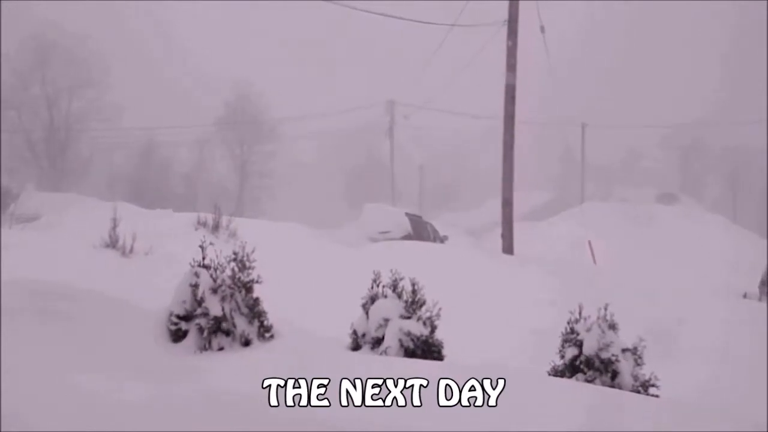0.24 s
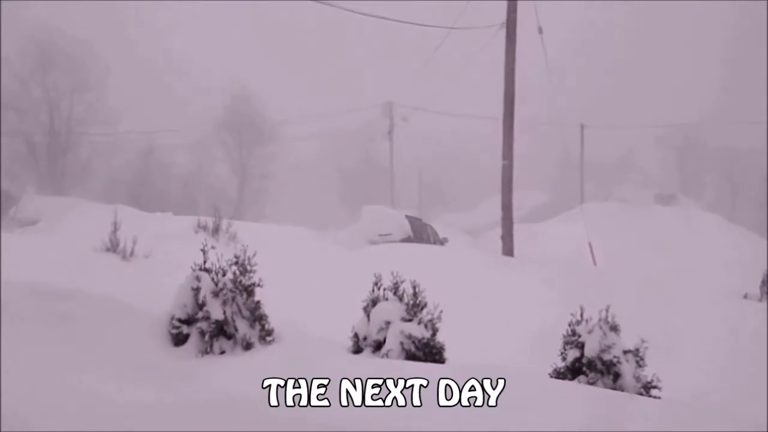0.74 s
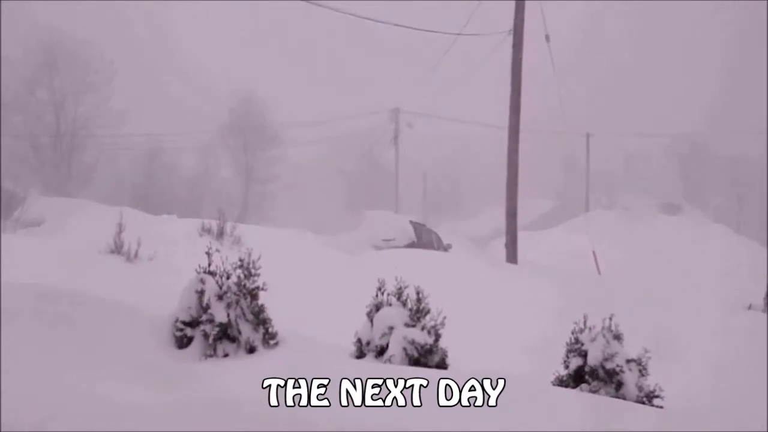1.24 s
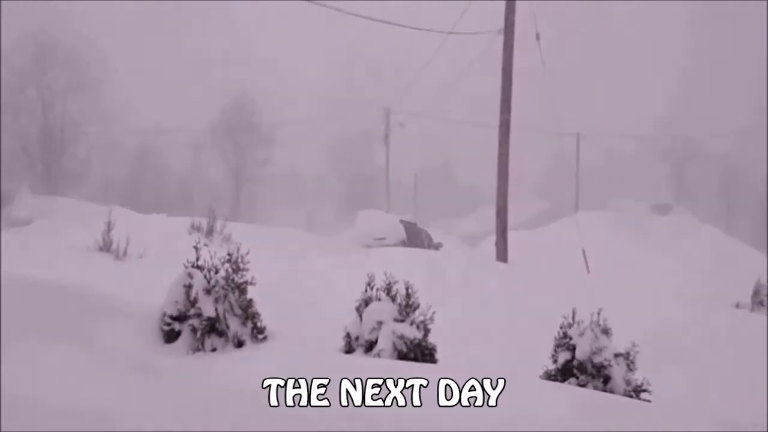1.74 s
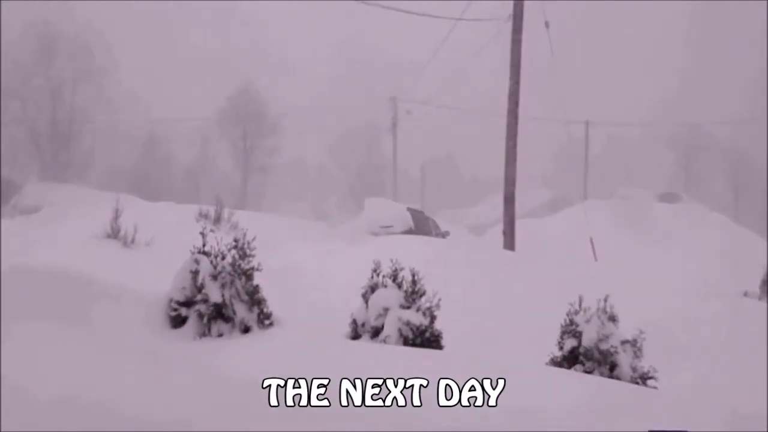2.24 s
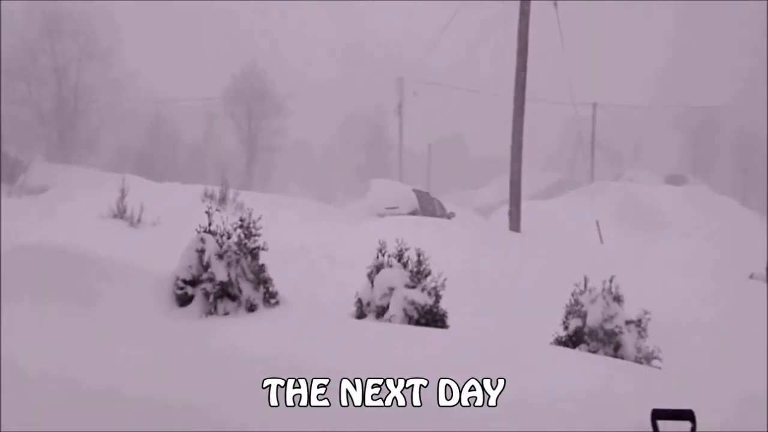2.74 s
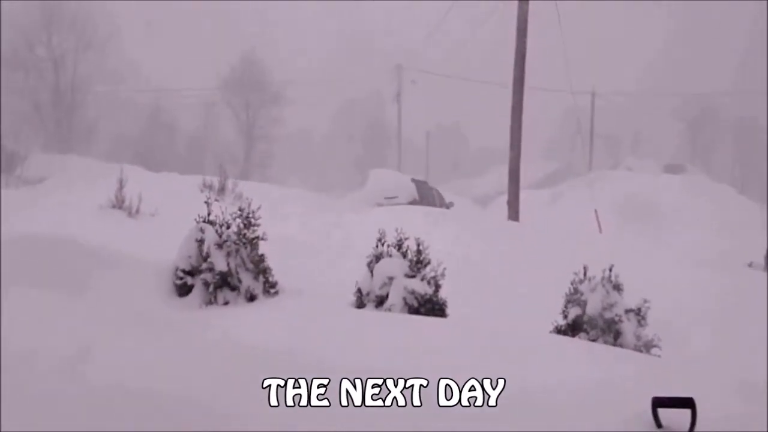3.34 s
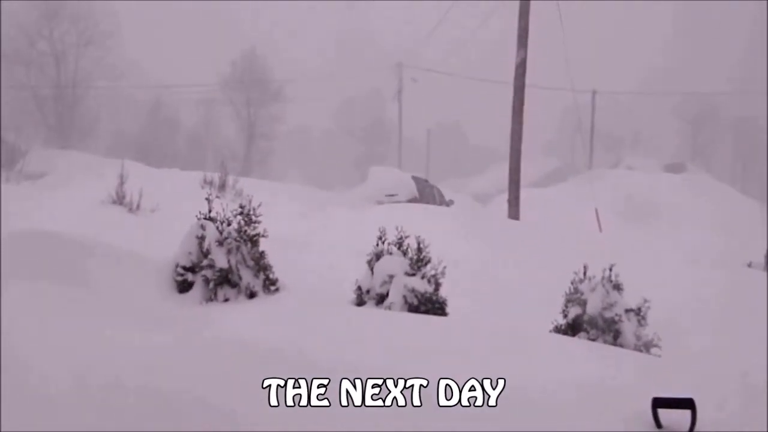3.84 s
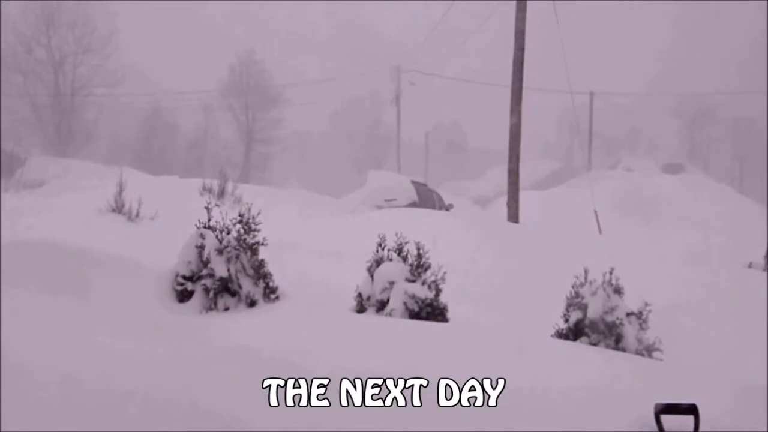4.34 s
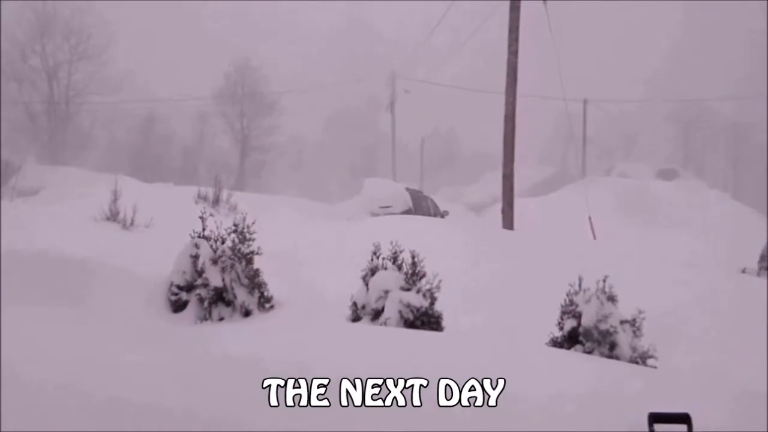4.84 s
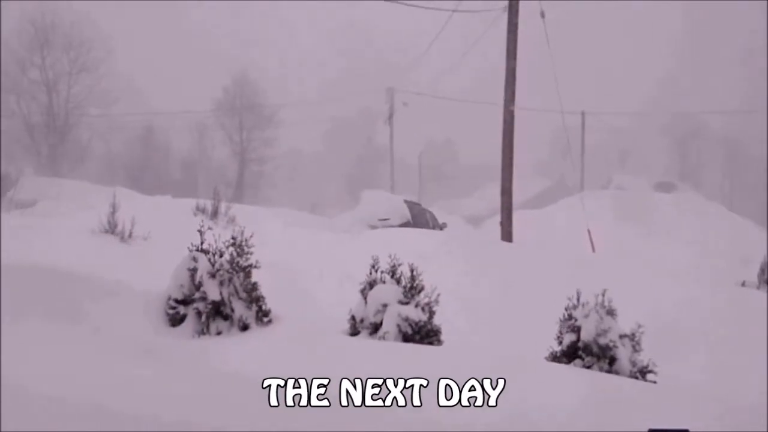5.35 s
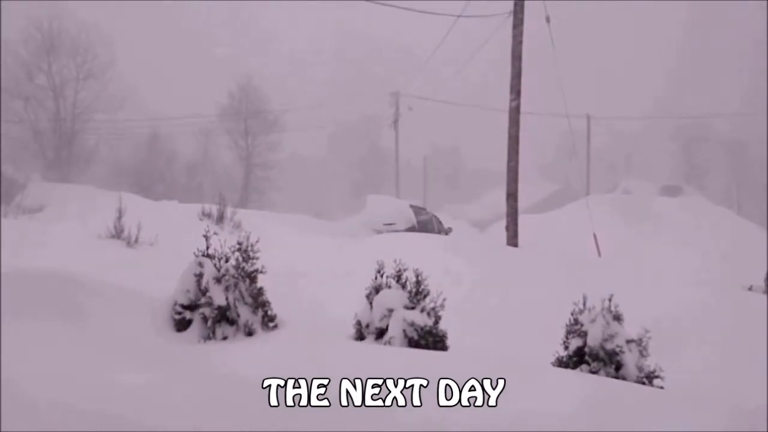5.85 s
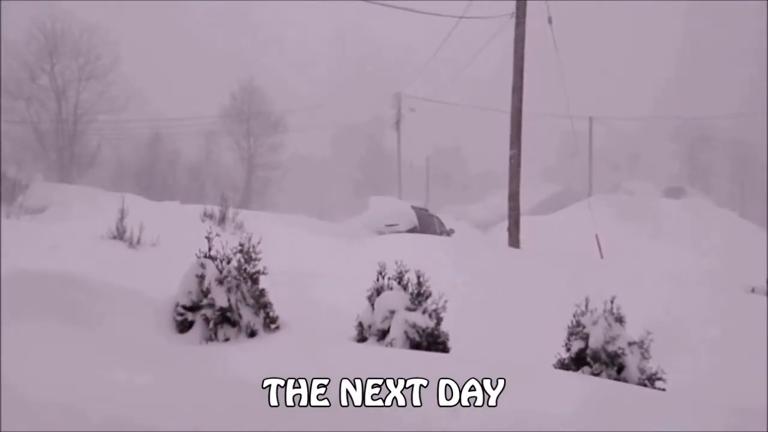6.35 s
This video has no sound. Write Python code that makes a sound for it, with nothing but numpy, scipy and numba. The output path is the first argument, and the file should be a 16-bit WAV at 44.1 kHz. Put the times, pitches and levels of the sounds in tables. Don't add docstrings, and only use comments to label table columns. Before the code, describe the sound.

Wind buffets a bare hand-held microphone in an open snowstorm, with no room echo. From the start there is low rumble and fluttering, and two hard, overloaded slaps hit around 0.3 s with small dry ticks. It eases from about 0.6 to 1.0 s, leaving faint far roar and hiss. Thumps return at 1.1 s and cluster from 1.4 to 1.9 s, then a lull has only an isolated buffet near 2.4 s. A rolling gust swells from 2.7 to 3.2 s, with sharper slaps at 3.3 to 3.5 s. Softer puffs follow through about 4.9 s, broken by one stronger thump at 4.4 s. Heavy blows land at 5.0, 5.2 and 5.5 s. The densest, sharpest battering runs from 5.9 to 6.3 s among snow ticks, and a deep blow hits near 6.45 s. Treble drops out momentarily throughout, leaving muffled, slightly watery gaps.

```python
import sys
import numpy as np
from scipy import signal
from scipy.fft import rfft, irfft, dct
from scipy.io import wavfile
from scipy.ndimage import uniform_filter1d
from numba import njit

SR = 44100
rng = np.random.default_rng(int(sys.argv[2]) if len(sys.argv) > 2 else 0)


def invert_db(level):
    return 10 ** (np.asarray(level, dtype=float) / 20)


def persist_wave(psi):
    counts = np.round(np.clip(psi, -1, 1) * 32767).astype(np.int16)
    wavfile.write(sys.argv[1], SR, np.atleast_2d(counts).T)


N = 291060


@njit
def svf(x, hz, damp):
    low, band = np.empty(len(x)), np.empty(len(x))
    b, l = 0., 0.
    for i in range(len(x)):
        g = np.tan(np.pi * hz[i] / SR)
        v = (b + g * (x[i] - l)) / (1 + g * (g + damp))
        low[i] = l + g * v
        band[i] = damp * v
        b, l = 2 * v - b, l + 2 * g * v
    return low, band


def unit(x):
    return x / np.sqrt(np.mean(x ** 2))


def walk(rate):
    k = int(SR / rate)
    held = np.repeat(rng.standard_normal(N // k + 1), k)
    return unit(uniform_filter1d(uniform_filter1d(held, k), k)[:N])


def eddies(corner_hz, damp, even):
    x = svf(rng.standard_normal(N), corner_hz, damp)[1]
    x = svf(x, 1.4 * corner_hz, 1.06)[0]
    x = svf(x, 1.66 * corner_hz, 0.97)[0] / np.sqrt(corner_hz)
    swell = np.sqrt(uniform_filter1d(x ** 2, size=2000) + 1e-12)
    return unit(x / swell ** np.clip(even, 0, 1))


# t/s, turbulence level/dB, share of large slow eddies level/dB, share of fine eddies level/dB
FLOW = [(0.0, -26, -5.5, -3), (0.48, -34, -3, 4.5), (0.7, -45.5, 2.5, 1), (1.03, -43.5, 1, -2),
        (1.3, -29, 0.5, 1), (1.69, -24.5, 2.5, 0.5), (2.15, -45.5, 0.5, 0.5), (2.7, -45.5, 1, 3.5),
        (2.87, -20, -1, 0.5), (3.07, -24.5, -3, 1), (3.42, -31, 0, -0.5), (3.53, -39.5, 0, 4.5),
        (4.17, -48, 0.5, -1.5), (5.33, -22, -3, 0.5), (5.75, -36, -0.5, -0.5), (6.07, -14, -3.5, -1),
        (6.32, -29, 4.5, -1), (6.6, -29, 1.5, 5)]


def gust():
    s, *controls = np.transpose(FLOW)
    return [np.interp(np.arange(N) / SR, s, c) for c in controls]


def rumble(db):
    corner_hz = 62 * invert_db(0.21 * (db + 29.5) + 0.76 * walk(5.3))
    return invert_db(db + 3.7 * walk(14) + 0.99 * walk(30)) * eddies(corner_hz, 3.1, even=0.68)


def churn(db):
    corner_hz = 150 * invert_db(0.27 * (db + 20.0) + 1.7 * walk(25))
    return invert_db(db - 7.5 + 2.3 * walk(35)) * eddies(corner_hz, 2.2, even=1.0)


# f/Hz, level per Hz/dB
STORM_SPECTRUM = [(130, -5), (250, -2), (420, -6.5), (550, -7.5), (700, -9), (900, -12), (1200, -14),
                  (1600, -18), (2200, -21), (3200, -26.5), (5000, -31.5), (7000, -34.5), (10000, -30.5),
                  (15000, -30)]
# t/s, level/dB, centre f/Hz
BLOWN_SNOW = [(0, 4, 2800), (0.602, 1, 2586), (1.2, 2, 2590), (2.1, 2, 2770), (2.45, 3, 4200),
              (2.649, 7.5, 4190), (2.901, 3.5, 3035), (3.298, -0.5, 2790), (3.6, 3, 2994), (3.75, 5, 3195),
              (4.0, 2.5, 2890), (4.298, -1, 2610), (4.7, 2, 2300), (5.2, 4.5, 2210), (5.45, -1, 2400),
              (6.1, -2, 3010), (6.27, 4.5, 4480), (6.6, 1, 2990)]


def storm():
    storm_db, snow_octaves = -49, .7
    hz, db = np.transpose(STORM_SPECTRUM)
    f = np.arange(N // 2 + 1) * SR / N + 1e-3
    colour = invert_db(np.interp(np.log(f), np.log(hz), db)) * (f > 120)
    s, *snow = np.transpose(BLOWN_SNOW)
    snow_db, snow_hz = (np.interp(np.arange(N) / SR, s, c) for c in snow)
    swell, out = walk(0.93), 0
    for step in range(15):
        share = np.sqrt(np.clip(1 - np.abs(2 * np.log2(f / 130) - step), 0, 1))
        band = irfft(rfft(rng.standard_normal(N)) * colour * share, N)
        octaves_off = step / 2 - np.log2(snow_hz / 130)
        bright_db = snow_db * np.exp(-(octaves_off / snow_octaves) ** 2)
        out = out + band * invert_db(.5 * swell + 0.48 * walk(15) + bright_db)
    rise_db = np.linspace(-1.2, 1.2, N)
    return invert_db(storm_db + rise_db) * unit(out)


def spray(strength):
    corner_hz = 220 + 200 * np.clip(strength, 0, 1)
    fine = svf(rng.standard_normal(N), corner_hz, 0.49)[1]
    fine = svf(fine, 0.73 * corner_hz, 1.53)[0]
    lingering = np.sqrt(np.abs(uniform_filter1d(strength ** 2, size=500)))
    return invert_db(-9 + 2.2 * walk(90)) * lingering ** 1.132 * unit(fine)


def passing_hz(db):
    return max(155.4 + 3.5 * (db + 17.5), 90)


def flutter(gust_db):
    per_s, above_flow_db, scatter_db, typical_ms = 45, 2.5, 2.5, 7
    count = int(per_s * N / SR)
    when, size, length = rng.uniform(-1, 1, (count, 3)).T
    s = (np.arange(count) + .5 + when / 2) / per_s
    db = gust_db[(s * SR).astype(int)] + above_flow_db + scatter_db * size
    ms = typical_ms * invert_db(3 * length)
    return [(a, b, passing_hz(b), c) for a, b, c in zip(s, db, ms)]


# centre t/s, peak level/dB
ROLLING = [(0.038, -23.5), (0.095, -30.5), (0.252, -30.5), (0.628, -24), (0.675, -28.5), (0.938, -25),
           (1.3, -23.5), (1.341, -21.5), (1.746, -21.5), (2.167, -25), (2.24, -31), (2.986, -13),
           (3.056, -11.5), (3.2, -24), (3.279, -18.5), (3.552, -19), (3.83, -21.5), (3.857, -23.5),
           (3.945, -19), (4.457, -23.5), (4.519, -28.5), (4.725, -24), (4.88, -20), (4.97, -22),
           (5.454, -14), (5.694, -26), (5.757, -22.5), (5.827, -21), (6.329, -22.5), (6.509, -18.5)]


def rolls():
    return [(s, db, .85 * passing_hz(db), 26.3) for s, db in ROLLING]


# t/s, peak level/dB, bright share level/dB
GRAINS = [(0.092, -25, -40), (0.297, -31.5, -38), (0.311, -34, -24), (0.3304, -29.5, -35),
          (0.342, -38.5, -43.5), (3.4357, -34, -29), (3.5168, -37, -24), (4.794, -25, -25),
          (5.023, -31.5, -33.5), (5.234, -32.5, -41), (5.874, -46.5, -18), (5.9329, -24, -36.5),
          (5.9804, -33.5, -35), (6.098, -46, -24), (6.126, -34, -45), (6.2566, -41.5, -19),
          (6.4549, -23, -37), (6.482, -35.5, -40), (6.569, -37, -43.5), (6.01, -32, -41),
          (6.15, -32.5, -42), (6.115, -36.5, -42), (5.947, -33.5, -31), (5.998, -34, -35)]


def ticks():
    out, t = np.zeros(N + 400), np.arange(400) / SR
    for (s, db, bright_db), grain in zip(GRAINS, rng.standard_normal((len(GRAINS), 400))):
        decay = np.exp(-t / 0.00043)
        knock = np.sin(2 * np.pi * 1450 * t) * decay * (1 - decay)
        rasp = invert_db(bright_db + 5) * signal.lfilter([1], [1, -.68], grain) * np.exp(-t / 0.0023)
        at = int(s * SR)
        out[at:at + 400] += invert_db(db + 9) * (knock + rasp)
    return out[:N]


# centre t/s, peak level/dB, length/ms
LIGHT_EDDIES = [(0.147, -19.5, 20), (0.175, -13.5, 12), (0.395, -16.5, 8), (0.455, -21, 24),
                (0.506, -13, 6.6), (0.57, -21.5, 22), (1.206, -16, 15), (1.688, -13.5, 21),
                (1.954, -17.5, 15), (2.37, -23, 9), (2.689, -15.5, 16), (2.804, -17, 15), (2.87, -18, 7.6),
                (3.16, -12.5, 25), (3.323, -9.5, 6.7), (3.741, -19.5, 13), (3.895, -16.5, 22),
                (3.978, -17, 14), (4.031, -21, 15), (4.3, -21, 22), (4.666, -13.5, 9.1), (4.789, -16.5, 26),
                (4.834, -13.5, 10), (5.12, -16.5, 24), (5.268, -12, 24), (5.34, -14, 11), (5.4, -14.5, 28),
                (5.573, -10.5, 9), (6.05, -10.5, 6.7), (6.562, -15.5, 28)]


def puffs():
    return [(s, db, passing_hz(db), ms) for s, db, ms in LIGHT_EDDIES]


# centre t/s, peak level/dB, swing rate f/Hz, length/ms
HARD_EDDIES = [(0.296, -5, 148.6, 20), (0.338, -6.5, 232.7, 15.4), (1.107, -10, 166.4, 12),
               (1.16, -9.5, 134.6, 39), (1.438, -13.5, 163.3, 17), (1.535, -7.5, 138.8, 26),
               (1.575, -9.5, 150.6, 34), (1.628, -11.5, 190.6, 22), (1.883, -11.5, 212, 14.3),
               (2.437, -13, 156.2, 18.7), (2.738, -15, 192.3, 27), (2.95, -12, 177.6, 20),
               (3.02, -10.5, 179.2, 20), (3.1, -11.5, 190.4, 45), (3.374, -8.5, 162, 7),
               (3.441, -9.5, 231.6, 21), (3.506, -7.5, 216.8, 32), (4.402, -8.5, 135.5, 18),
               (5.024, -5, 188, 9), (5.234, -6, 146.5, 24), (5.503, -4, 165, 12), (5.878, -8.5, 273.6, 17),
               (5.908, -6.5, 230, 12), (5.945, -5, 210, 45), (5.995, -9.5, 253, 30.7),
               (6.101, -5, 210, 3.5), (6.138, -10, 194.4, 16), (6.21, -9, 180.8, 14),
               (6.261, -6, 176.2, 17), (6.461, -3, 117.8, 32)]


def slaps(lighter):
    rows = [*HARD_EDDIES, *lighter]
    swings, strength = np.zeros(N), np.zeros(N)
    t = np.arange(-3000, 3000) / SR
    for (s, db, hz, ms), (phase, bend, twist, lag) in zip(rows, rng.standard_normal((len(rows), 4))):
        spread = 0.0004 * ms
        shape = np.exp(-.5 * (t / (spread * np.where(t < 0, .85, 1.2))) ** 2)
        turn = 2 * np.pi * hz * t + 0.47 * bend * (t / spread) ** 2 + np.pi * (phase > 0) + .4 * phase
        swing = np.cos(turn + 0.63 * np.sin(.55 * turn + .5 * twist))
        heave = invert_db(-5.5) * shape ** .45 * np.cos(2 * np.pi * .52 * hz * t + 10 * lag)
        at = int(s * SR) + np.arange(-3000, 3000)
        inside = (at >= 0) & (at < N)
        swings[at[inside]] += (invert_db(db) * (shape * swing + heave))[inside]
        strength[at[inside]] += (invert_db(db) * (hz / 180) ** 1.26 * shape)[inside]
    return swings, strength


def scene():
    gust_db, large_db, fine_db = gust()
    swings, strength = slaps([*puffs(), *flutter(gust_db), *rolls()])
    rocking = invert_db(2 * -5) * np.abs(uniform_filter1d(strength ** 2, int(0.074 * SR)))
    steady = invert_db(2 * (-33.5 + 0.17 * (gust_db + 32.5)))
    wind = rumble(large_db + 10 * np.log10(steady + rocking)) + churn(gust_db)
    fine = invert_db(fine_db) * spray(strength + invert_db(gust_db - 0.5))
    return (wind + swings + fine + ticks() + storm())[None]


# centre t/s, length/ms, treble left level/dB
DEEP_DROPOUTS = [(0.122, 40, -19), (0.21, 32, -29), (0.321, 15, -20), (0.428, 25, -16), (0.478, 41, -23),
                 (0.56, 41, -23), (0.611, 42, -23), (0.989, 41, -22), (1.535, 17, -30), (1.862, 21, -21),
                 (1.973, 41, -30), (2.333, 31, -30), (2.65, 42, -23), (2.765, 21, -19), (3.308, 18, -30),
                 (3.585, 14, -21), (4.012, 13, -23), (4.356, 25, -23), (4.755, 36, -18), (4.97, 31, -26),
                 (5.15, 36, -30), (5.191, 29, -19), (5.231, 21, -16), (5.834, 30, -30), (5.972, 22, -23),
                 (6.399, 30, -22), (6.507, 15, -21), (6.561, 19, -17)]
SLIGHT_DROPOUTS = [.362, .647, .689, 1.02, 1.052, 1.273, 1.678, 2.134, 2.545, 2.79, 2.925, 2.958, 3.12,
                   3.458, 3.652, 3.804, 4.06, 4.152, 4.417, 4.558, 4.684, 4.828, 4.87, 5.046, 5.091, 5.411,
                   5.53, 5.665, 6.018, 6.199]


def dropouts(x):
    f = np.arange(N // 2 + 1) * SR / N
    upper = irfft(rfft(x) * np.clip(f / 400 - 1.5, 0, 1), N)
    out = x.copy()
    rows = [*DEEP_DROPOUTS, *[(s, 16, -13) for s in SLIGHT_DROPOUTS]]
    for (s, ms, left_db), edge_hz in zip(rows, rng.uniform(2300, 3500, len(rows))):
        slope = 1000 if left_db > -25 else 450
        size = int(max(ms * SR / 1000 - .82 * slope, 0)) + 2 * slope
        a = int(s * SR) - size // 2
        from_end = np.minimum(np.arange(size), np.arange(size)[::-1])
        window = np.sin(np.pi / 2 * np.clip(from_end / slope, 0, 1))
        lines = dct(upper[a:a + size] * window, norm="ortho")
        line_hz = np.arange(size) * SR / (2 * size)
        coarse = np.interp(line_hz, [700, 1500, edge_hz, 1.25 * edge_hz], [1.4, 3.5, 4.5, 6.9])
        step = coarse * np.sqrt(np.abs(uniform_filter1d(lines ** 2, size=60))) + 1e-9
        kept = dct(step * np.round(lines / step), type=3, norm="ortho")
        fade = np.sqrt(1 - window ** 2 * (1 - invert_db(2 * left_db - 4)))
        out[a:a + size] += (fade - 1) * upper[a:a + size] + invert_db(1.5) * window * kept
    return out


def low_pass(x):
    return signal.sosfilt(signal.butter(12, 15780, fs=SR, output="sos"), x)


def record(dry):
    clip_level, knee = .71, 7
    x = dry[0] / (2 + np.abs(dry[0] / clip_level) ** knee) ** (1 / knee)
    x = signal.sosfilt(signal.butter(1, 5, "high", fs=SR, output="sos"), x)
    limited = signal.sosfilt(signal.ellip(10, .2, 60, 15050, fs=SR, output="sos"), x)
    leak = invert_db(-42.5 + 33 * (walk(18) > 1.0))
    x = dropouts(limited + leak * (x - limited))
    return low_pass(x[None])


dry = scene()
out = record(dry)
persist_wave(out)
```